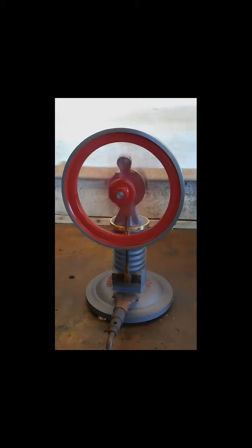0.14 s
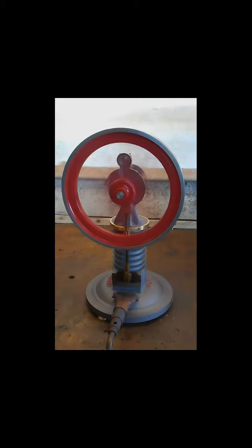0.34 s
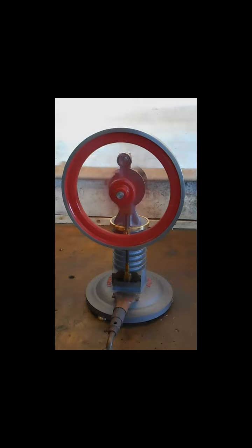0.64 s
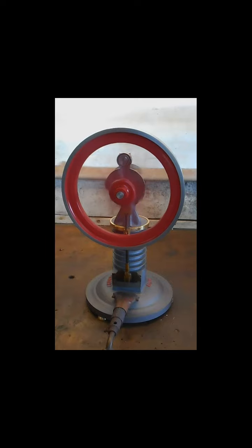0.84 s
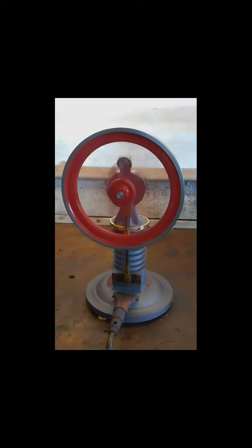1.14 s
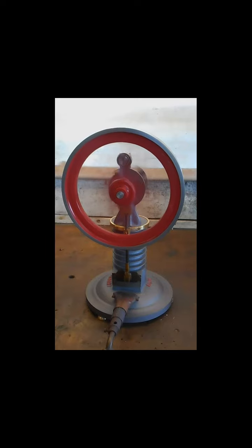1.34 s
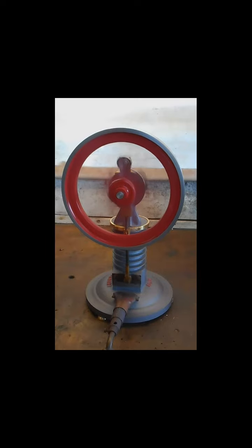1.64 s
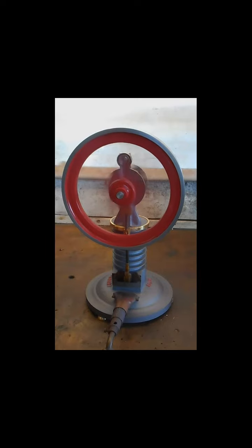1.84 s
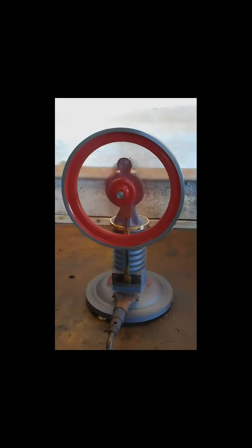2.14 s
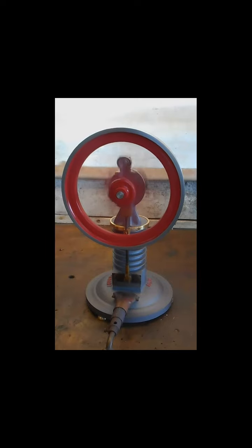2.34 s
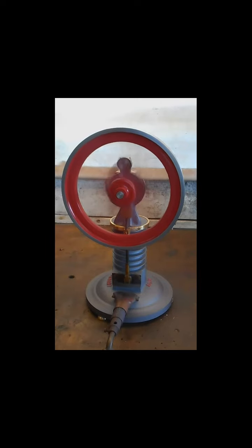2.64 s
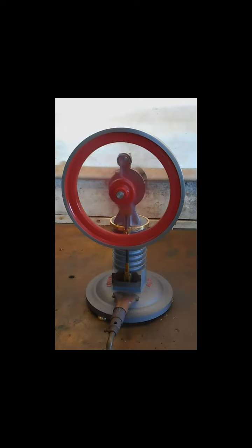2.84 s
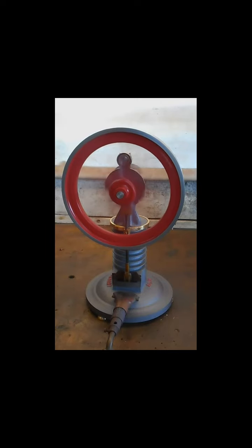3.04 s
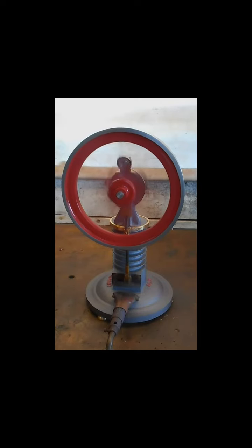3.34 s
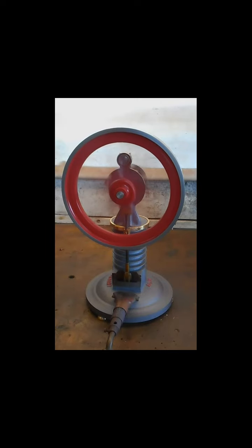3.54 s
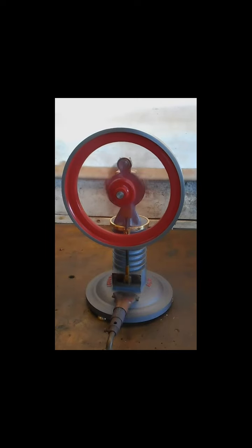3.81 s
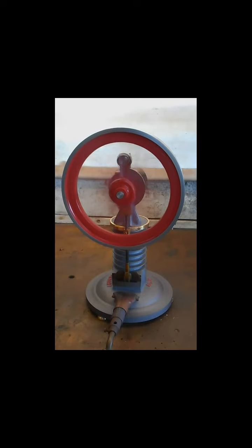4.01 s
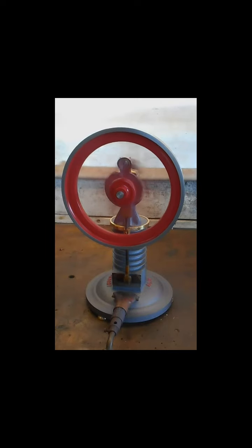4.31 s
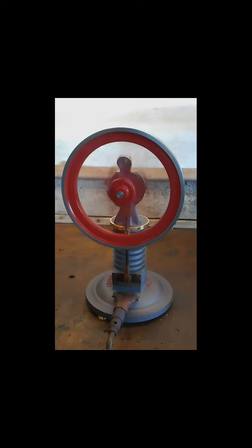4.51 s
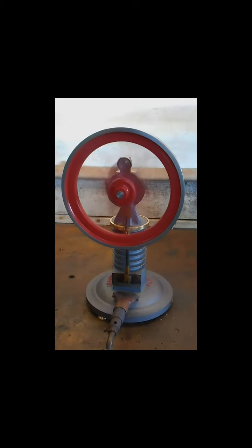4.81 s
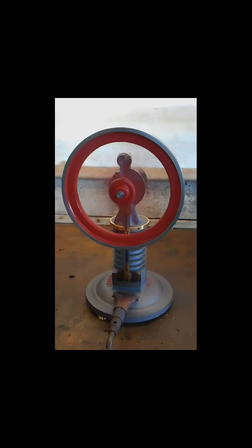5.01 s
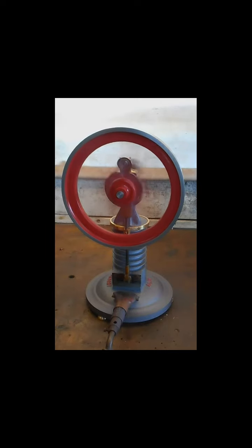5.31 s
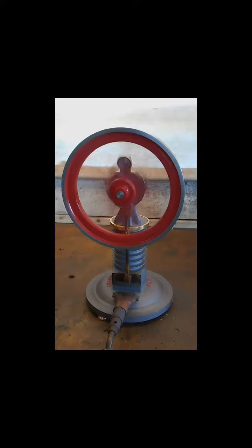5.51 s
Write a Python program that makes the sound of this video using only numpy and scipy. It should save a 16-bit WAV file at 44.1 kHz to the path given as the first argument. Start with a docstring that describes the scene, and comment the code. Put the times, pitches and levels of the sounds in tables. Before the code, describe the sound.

A small single-cylinder model engine runs on a workbench, heard from close by, from the start to the end at about 5.7 seconds. It turns evenly, about six times a second. Each turn begins with a light metallic tick, followed almost at once by a sharp, chattering valve clack, joined by a soft thump on the bench, a hollow cylinder ring and a tiny spring ping. A lighter linkage knock follows. The clacks vary a little in strength, softer near 1, 2 and 3 seconds. Underneath, piston friction makes a soft scrape and a continuous, mid-pitched metallic ring that pulses with each turn. A faint, thin, high hiss is there at the start, dips, swells from about 2 to 3.2 seconds, fades near 3.7 and creeps back toward the end. Nearby walls add a short, dull echo.

```python
"""A small single-cylinder model engine runs on a workbench, six turns a second, heard from close by.
From the start a thin hiss swells and fades, and piston friction keeps the metal ringing.
On each turn the valve gear ticks; about 50 ms later the power stroke thumps the bench, the valve clacks
shut and rebounds, and the cylinder rings hollow. Then the linkage knocks and the piston slides on.
Nearby walls echo; a limiter flattens the loudest clacks."""
import sys
import numpy as np
from scipy import signal
from scipy.fft import rfft, irfft
from scipy.io import wavfile
from scipy.ndimage import uniform_filter1d, minimum_filter1d, map_coordinates

SR = 44100
rng = np.random.default_rng(int(sys.argv[2]) if len(sys.argv) > 2 else 0)


def pcm_store(signal):
    """Save signal as 16-bit PCM."""
    levels = np.round(np.clip(np.atleast_2d(signal), -1, 1) * 32767)
    wavfile.write(sys.argv[1], SR, levels.astype(np.int16).T)


N = 249606
TIME = np.arange(N) / SR

# broad responses of frame, bench and valve spring: freq_hz, gain_db
FRAME = [(40, -40.5), (150, -15.5), (300, -9.5), (600, -9.5), (1000, 1), (1500, -2), (2000, -2),
         (2700, -6.5), (3700, 0), (5400, -9.5), (7000, -9.5), (9000, -15.5), (10500, -25)]
BENCH = [(30, -32.5), (90, -20.5), (150, -17.5), (280, -3.5), (450, 1.5), (700, -3.5), (1100, -26),
         (3000, -54.5)]
SPRING = [(2000, -37.5), (6000, -9), (7500, -5.5), (9000, -20), (12000, -41.5)]
# their resonances: centre_hz, width_hz, boost_db
FRAME_PEAKS = [(298, 40, 7.9), (889, 54, 20.3), (1275, 28, 11.5), (1696, 94, 8.3), (2212, 138, 16),
               (4040, 73, 6.8), (4704, 180, 11), (5600, 230, 9.7), (9100, 280, 3.9)]
BENCH_PEAKS = [(189, 21, 3.4), (296, 38, 3.3), (418, 30, 5.6), (531.3, 30, 14.7), (625.6, 11, 7.3),
               (697, 10, 4.7)]
SPRING_PEAKS = [(7577, 70, 20.5), (7770, 160, 9.1)]


def from_db(db):
    """Decibels to gain."""
    return 10 ** (np.asarray(db) / 20)


def unit_rms(x):
    """Scale to rms 1."""
    return x / np.sqrt(np.mean(x ** 2) + 1e-20)


def along(curve, places):
    """Interpolate a two-column table."""
    return np.interp(places, *np.transpose(curve))


def scatter(times_s, spread):
    """One Gaussian deviation per turn."""
    return spread * rng.standard_normal(len(times_s))


def body(response, peaks, size=8192):
    """Impulse response of a part from its broad response and resonances."""
    hz = np.maximum(np.fft.rfftfreq(size, 1 / SR), 1)
    points_hz, points_db = np.transpose(response)
    broad = from_db(np.interp(np.log(hz), np.log(points_hz), points_db))
    power = 1 + sum(from_db(2 * db) / (1 + (2 * (hz - centre_hz) / width_hz) ** 2)
                    for centre_hz, width_hz, db in peaks)
    # minimum phase: nothing rings before the blow
    cepstrum = irfft(np.log(broad * np.sqrt(power)))
    return irfft(np.exp(2 * rfft(cepstrum[:size // 2], size)))


def rubbed(impulse):
    """A part driven by steady noise; rms 1."""
    return unit_rms(signal.fftconvolve(rng.standard_normal(N + len(impulse) - 1), impulse, "valid"))


def blows(times_s, levels_db, impulse, rattle, fall_s, rise_s=0.00024, pitch=1):
    """Each blow drives a part with a click and a dying rattle (energy share, 0-1); pitch is a ratio."""
    out = np.zeros(N + 2 * len(impulse))
    age = np.arange(len(impulse))
    swell = (1 - np.exp(-age / SR / rise_s)) ** 2 * np.exp(-age / SR / fall_s)
    for time_s, db, ratio in zip(times_s, levels_db, pitch * np.ones(len(times_s))):
        grains = rng.standard_normal(len(age)) * rng.exponential(1, len(age))
        grains *= rng.random(len(age)) < .2
        force = np.sqrt(rattle) * grains * swell / np.linalg.norm(grains * swell)
        force[0] -= np.sqrt(1 - rattle)   # click
        tuned = map_coordinates(impulse, [age * ratio], order=3)
        sound = signal.fftconvolve(force, tuned)[:len(age)]
        sound *= np.sqrt(SR / 100) / np.linalg.norm(sound)   # energy of 10 ms at rms 1
        start = max(round(time_s * SR), 0)
        out[start:start + len(age)] += from_db(db) * sound
    return out[:N]


def hiss():
    """A thin hiss, likely the burner's gas jet, swells and fades."""
    swell = [(0.0, -39), (0.31, -48.5), (1.56, -43.5), (1.89, -37), (3.21, -36), (3.72, -48), (4.15, -41.5),
             (5.66, -38)]   # hiss strength: time_s, relative_db
    jet = [(3500, -40.5), (4800, -10), (5350, 4), (5750, -6), (6100, -14.5), (7500, -33.5)]   # broad spectrum: freq_hz, gain_db
    jet_peaks = [(5300, 220, 4.6)]   # resonance: centre_hz, width_hz, boost_db
    return from_db(along(swell, TIME) - 1.5) * rubbed(body(jet, jet_peaks))


def wheel_note(pitch_hz=883, width_hz=16.2, span_s=0.024):
    """Friction keeps a clear note alive in the flywheel; steady pressure holds it nearly even."""
    band_hz = [pitch_hz - width_hz / 2, pitch_hz + width_hz / 2]
    narrow = signal.butter(2, band_hz, "band", fs=SR, output="sos")
    note = unit_rms(signal.sosfilt(narrow, rng.standard_normal(N + SR))[SR:])
    return note / np.sqrt(uniform_filter1d(note ** 2, int(span_s * SR)) + 1e-9)


def piston(stroke_s):
    """Friction follows the crank angle, driving a low sliding ring, the wheel's note and a scrape."""
    # friction over the run: time_s, relative_db
    slide_drift = [(0.22, -28), (0.72, -28.5), (0.89, -31.5), (3.75, -28), (3.91, -28.3), (5.58, -28)]
    scrape_drift = [(0.2, -39.5), (1.1, -37), (2.1, -34), (3.4, -37.5), (3.6, -40.5), (4.25, -36.5),
                    (5.6, -38)]
    # friction from stroke to stroke: angle_turns, gain_db
    slide_cycle = [(0, -15), (.15, 5), (.27, 1), (.38, 2.5), (.46, 1.5), (.56, 3), (.66, -0.5), (.82, 2.5),
                   (.9, -13.5), (1, 2.5)]
    scrape_cycle = [(0, 2.5), (.15, 7), (.3, -3), (.4, -5.5), (.5, 4), (.63, 2), (.75, -2.5), (.86, 1),
                    (1, 1.5)]
    # broad responses of the rubbed metal: freq_hz, gain_db
    slide = [(40, -38.5), (150, -14.5), (300, -9), (700, -6), (960, 6.5), (1150, 5), (1400, -0.5),
             (1900, 4), (2250, 3), (2550, -2.5), (4000, -23.5)]
    scrape = [(500, -57.5), (1400, -3), (2000, 11.5), (2600, -5.5), (3200, -7.5), (3750, 8), (4250, -4),
              (5200, 4), (6200, -1.5), (7500, -7.5), (9300, -20), (10500, -42.5)]
    # its resonances: centre_hz, width_hz, boost_db
    slide_peaks = [(420, 21, 4.5), (522, 26, 13.3), (881.5, 60, 17.2), (1493, 19, 5.9), (1762, 70, 12.1),
                   (1935, 81, 6.3), (2200, 49, 6.2), (2250, 85, 13.6)]
    scrape_peaks = [(2172, 85, 9.3), (2880, 120, 5.6), (4130, 30, 12.4), (4778, 96, 13.4)]
    period_s = np.mean(np.diff(stroke_s))
    starts_s = np.r_[stroke_s[0] - period_s, stroke_s, stroke_s[-1] + period_s]
    angle_turns = np.interp(TIME, starts_s, np.arange(len(starts_s))) % 1
    slide_db = along(slide_drift, TIME) + along(slide_cycle, angle_turns)
    scrape_db = along(scrape_drift, TIME) + along(scrape_cycle, angle_turns)
    ring = from_db(slide_db - 3) * rubbed(body(slide, slide_peaks))
    note = from_db(slide_db - 4) * wheel_note()
    rasp = from_db(scrape_db + 2.5) * rubbed(body(scrape, scrape_peaks))
    return ring + note + rasp


def flywheel(first_tick_s=.0828):
    """Times at which the wheel completes a turn and trips the valve gear."""
    speed = [(0, 5.9902), (1.3, 5.8684), (1.9, 5.8857), (2.6, 5.9803), (3.6, 6.0277), (5.66, 5.9831)]   # wheel speed: time_s, turns_per_s
    turns = np.cumsum(along(speed, TIME)) / SR
    turns -= np.interp(first_tick_s, TIME, turns)
    return np.interp(np.arange(int(turns[-1]) + 1), turns, TIME)


def valve_gear(tick_s):
    """The gear ticks into the frame and trails off in a dull shudder of the bench."""
    base_db = -21.8 + scatter(tick_s, 1.5)
    ticks = blows(tick_s, base_db + 1, body(FRAME, FRAME_PEAKS), rattle=.92, fall_s=.0079)
    shudder = blows(tick_s + .00314, base_db - 11.5, body(BENCH, BENCH_PEAKS),
                    rattle=1, fall_s=.022, rise_s=.0038)
    return ticks + shudder


def thump(stroke_s, late_ms):
    """The stroke loads the creaking frame and pushes the base against the bench, harder when late."""
    base_db = -18.5 + .25 * late_ms + scatter(stroke_s, .8)
    creak = blows(stroke_s - .0025, base_db - 4.5, body(FRAME, FRAME_PEAKS),
                  rattle=1, fall_s=.0032, rise_s=.0034)
    push = blows(stroke_s + .00037, base_db + .5, body(BENCH, BENCH_PEAKS), rattle=.12, fall_s=.014)
    return creak + push


def valve(stroke_s, force_db):
    """The valve slaps its seat, rebounds with a chatter and rattles the frame."""
    response = [(200, -44.5), (700, -7.5), (1400, -2), (2200, -6), (2900, 5.5), (3600, 1.5), (4400, -4),
                (5600, -2), (7000, -22.5), (8700, -18), (10500, -36.5)]   # valve plate: freq_hz, gain_db
    peaks = [(2592, 52, 11.1), (2815, 95, 15), (2905, 81, 19), (3944, 50, 9.1), (6285, 120, 11.3)]   # its resonances: centre_hz, width_hz, boost_db
    plate = body(response, peaks)
    split_db = 3.5 + scatter(stroke_s, 5)   # clack over rebound; they share the energy
    rebound_db = force_db - 10 * np.log10(1 + from_db(2 * split_db))
    clack_db = rebound_db + split_db
    # pressed on its seat the plate is stiffer and rings sharp; the pitch sags on the rebound
    seating = 1 + scatter(stroke_s, .0085)
    clack = blows(stroke_s + .0053, clack_db, plate, rattle=.57, fall_s=.0032, pitch=1.0154 * seating)
    rebound = blows(stroke_s + .0098, rebound_db, plate,
                    rattle=.77, fall_s=.0048, rise_s=.00076, pitch=.992 * seating)
    clatter_db = (clack_db + rebound_db) / 2 - 8.5
    clatter = blows(stroke_s + .004, clatter_db, body(FRAME, FRAME_PEAKS), rattle=.99, fall_s=.0086)
    return clack + rebound + clatter


def cylinder(stroke_s, late_ms, harder_db):
    """The cylinder rings hollow under the clack and again as gas puffs out, louder after a late stroke."""
    response = [(150, -45.5), (500, -2.5), (800, 0.5), (1150, 2), (1500, -10), (2500, -44.5), (6000, -39.5)]   # cavity: freq_hz, gain_db
    peaks = [(943, 26, 13.4), (1032.5, 47, 15.9), (1130, 46, 7.2)]   # its resonances: centre_hz, width_hz, boost_db
    cavity = body(response, peaks)
    base_db = -14.5 + .11 * late_ms + scatter(stroke_s, 1.5)
    tuning = 1040 - 8 * harder_db + scatter(stroke_s, 36)   # a hard-shut valve lowers the puff's pitch
    struck = blows(stroke_s + .00416, base_db - 3.5, cavity, rattle=.45, fall_s=.0068, pitch=.99)
    puff = blows(stroke_s + .0135, base_db - .8, cavity,
                 rattle=.92, fall_s=.0048, rise_s=.001, pitch=1.02 * tuning / tuning.mean())
    return struck + puff


def spring(stroke_s, harder_db):
    """The valve spring pings, never at quite the same tension; a hard-shut valve damps it."""
    base_db = -25 - .57 * harder_db + scatter(stroke_s, 1)
    return blows(stroke_s + .0054, base_db + .7, body(SPRING, SPRING_PEAKS),
                 rattle=1, fall_s=.0058, rise_s=.0013, pitch=1 + scatter(stroke_s, .0079))


def linkage(tick_s, lag_s=.0846):
    """Half a turn after the tick, loose joints take up play, knock the frame and shake the spring."""
    knock_s = tick_s + lag_s + scatter(tick_s, .0012)
    base_db = -25 + scatter(tick_s, 2)
    knocks = blows(knock_s, base_db - .5, body(FRAME, FRAME_PEAKS), rattle=.9, fall_s=.0046)
    jingle = blows(knock_s, base_db - 17, body(SPRING, SPRING_PEAKS), rattle=.54, fall_s=.0022)
    return knocks + jingle


def workshop(x, wall_cut_hz=1070, t60_s=.15, tail_db=-14, predelay_s=.0028):
    """Dull echoes from nearby walls and a short, dense tail."""
    walls = [(0.013, -23), (0.0255, -19)]   # reflections: delay_s, gain_db
    dull = signal.sosfilt(signal.butter(1, wall_cut_hz, fs=SR, output="sos"), x)
    echoes = sum(from_db(db) * np.interp(TIME - delay_s, TIME, dull, left=0) for delay_s, db in walls)
    age_s = TIME[:SR // 2]
    onset = np.clip(age_s / predelay_s - 1, 0, 1)
    tail = rng.standard_normal(len(age_s)) * from_db(-60 * age_s / t60_s) * onset
    return echoes + from_db(tail_db) * signal.fftconvolve(x, tail / np.linalg.norm(tail))[:N]


def scene():
    """The flywheel times every moving part; the room answers."""
    stroke_delay = [(0.09, 0.0551), (0.25, 0.048), (0.42, 0.052), (0.58, 0.046), (1.1, 0.055), (1.6, 0.05),
                    (1.95, 0.057), (2.46, 0.055), (2.62, 0.052), (3.29, 0.056), (3.78, 0.0447),
                    (3.95, 0.051), (4.45, 0.051), (4.61, 0.048), (4.95, 0.051), (5.45, 0.049)]   # lag from tick to power stroke: time_s, delay_s
    valve_force = [(0.14, -7), (0.63, -3), (1.15, -11), (1.49, -4.5), (1.83, -6), (2.0, -10.5), (2.67, -5),
                   (3.01, -12.5), (3.83, -3.5), (4.5, -9), (4.66, -5.5), (5.5, -6)]   # shutting force: time_s, level_db
    tick_s = flywheel()
    delay_s = along(stroke_delay, tick_s)
    stroke_s = tick_s + delay_s
    late_ms = (delay_s - delay_s.mean()) * 1000
    force_db = along(valve_force, stroke_s)
    harder_db = force_db - force_db.mean()
    engine = hiss() + piston(stroke_s) + valve_gear(tick_s)
    engine += thump(stroke_s, late_ms) + valve(stroke_s, force_db)
    engine += cylinder(stroke_s, late_ms, harder_db) + spring(stroke_s, harder_db) + linkage(tick_s)
    return (engine + workshop(engine))[None]


def record(dry):
    """A fast look-ahead limiter holds the clacks down; deep bass and top are cut."""
    ceiling, hold_s = .74, .0007
    bass_cut_hz, stopband_hz = 50, 11200
    hold = int(hold_s * SR)
    allowed = ceiling / np.maximum(np.abs(dry), ceiling)
    gain = uniform_filter1d(minimum_filter1d(allowed, hold), hold)
    bass_cut = signal.butter(1, bass_cut_hz, "high", fs=SR, output="sos")
    top_cut = signal.firwin(121, stopband_hz - 700, window=("kaiser", 9), fs=SR)
    return signal.fftconvolve(signal.sosfilt(bass_cut, dry * gain), top_cut[None], "same")


dry = scene()
out = record(dry)
pcm_store(out)
```